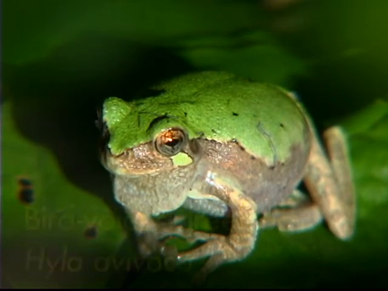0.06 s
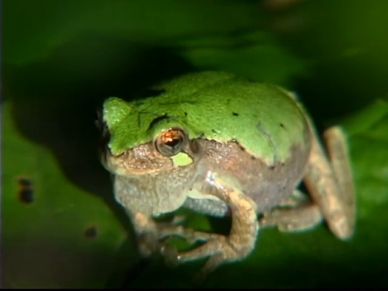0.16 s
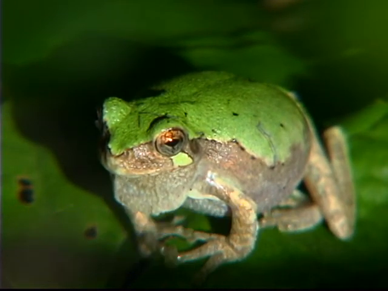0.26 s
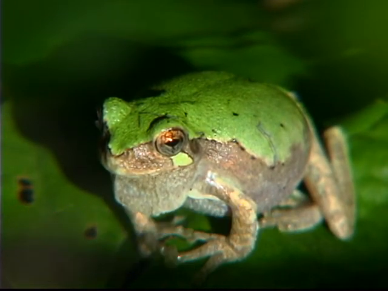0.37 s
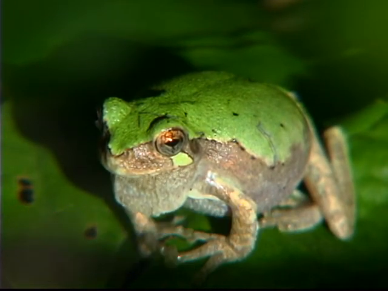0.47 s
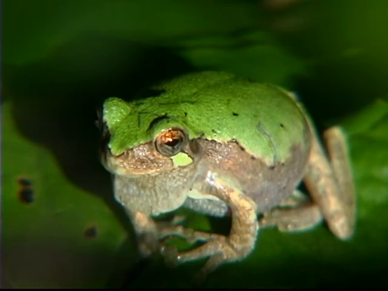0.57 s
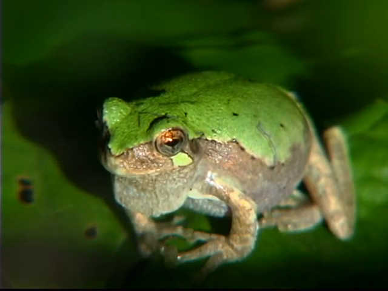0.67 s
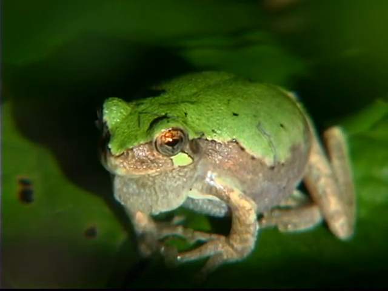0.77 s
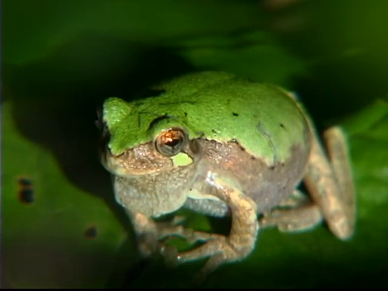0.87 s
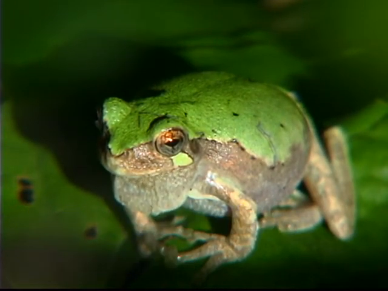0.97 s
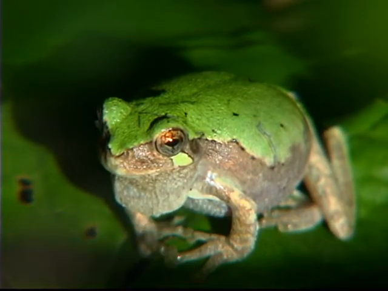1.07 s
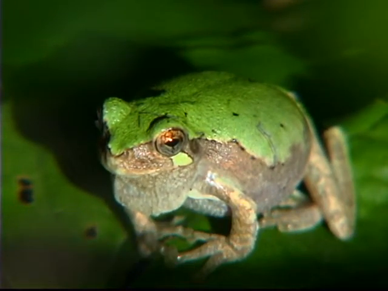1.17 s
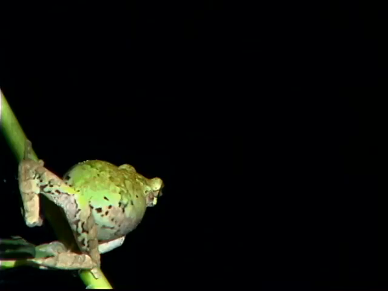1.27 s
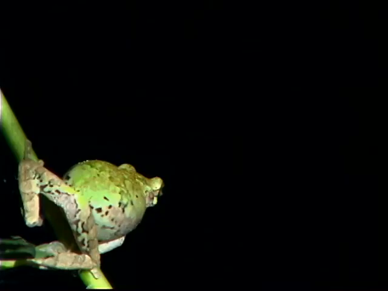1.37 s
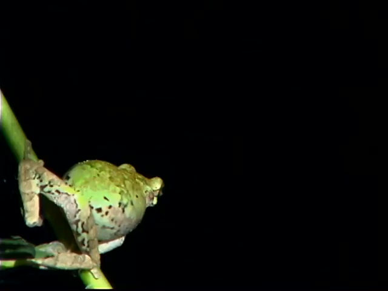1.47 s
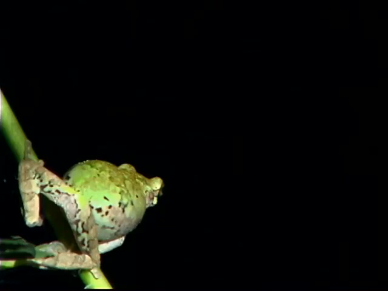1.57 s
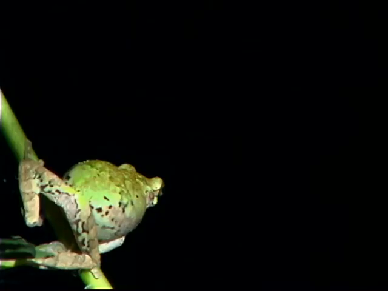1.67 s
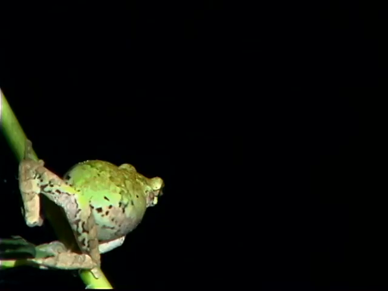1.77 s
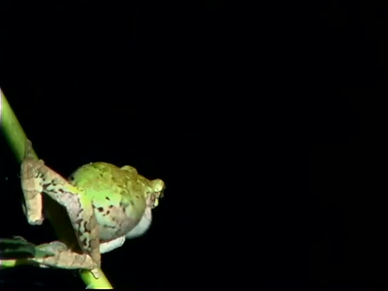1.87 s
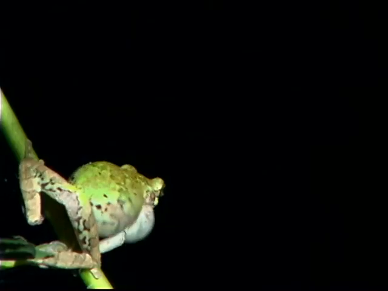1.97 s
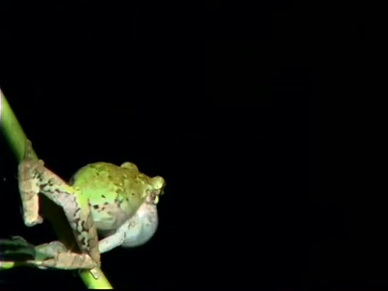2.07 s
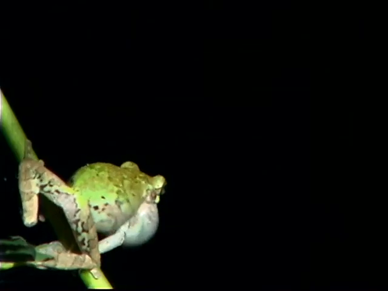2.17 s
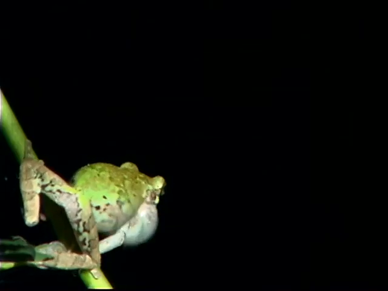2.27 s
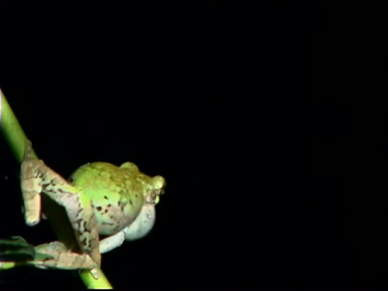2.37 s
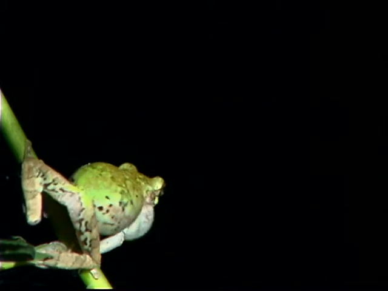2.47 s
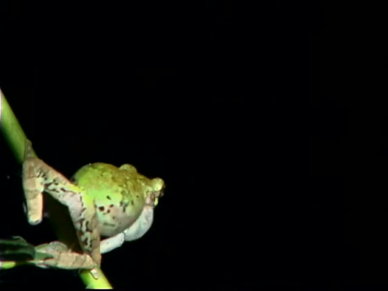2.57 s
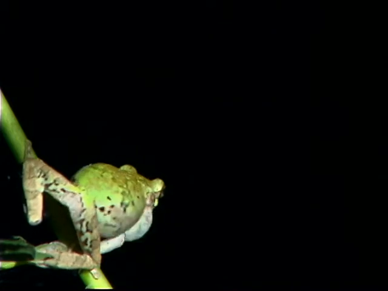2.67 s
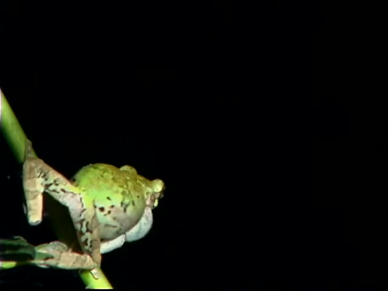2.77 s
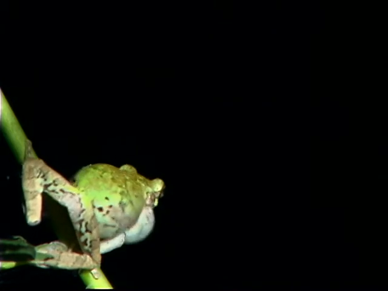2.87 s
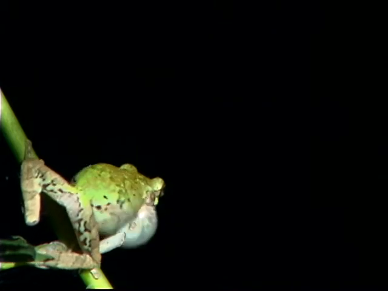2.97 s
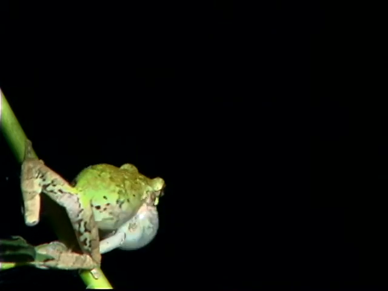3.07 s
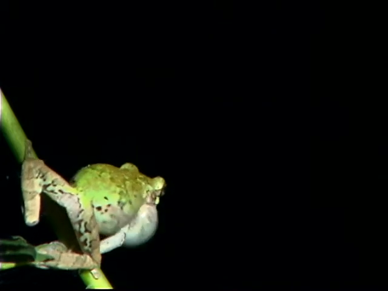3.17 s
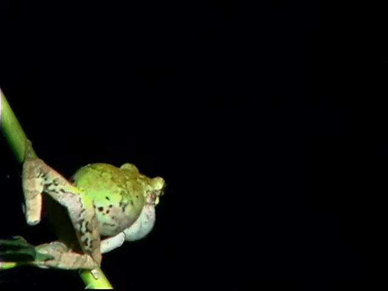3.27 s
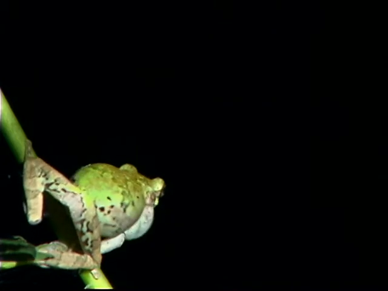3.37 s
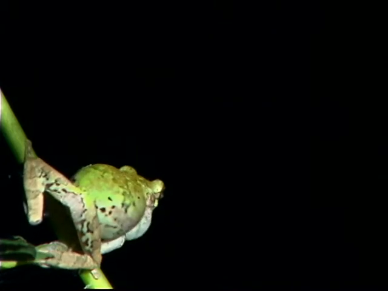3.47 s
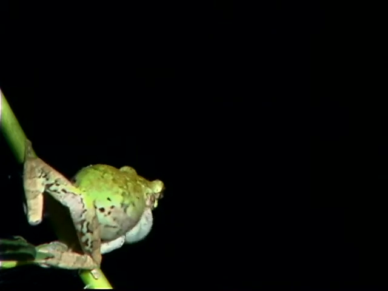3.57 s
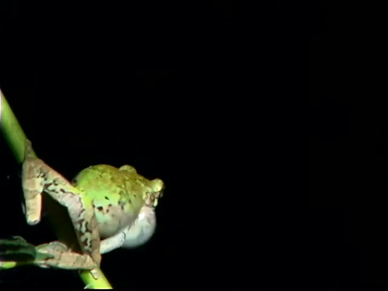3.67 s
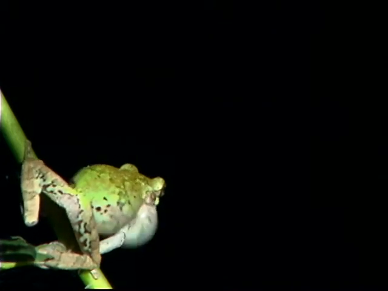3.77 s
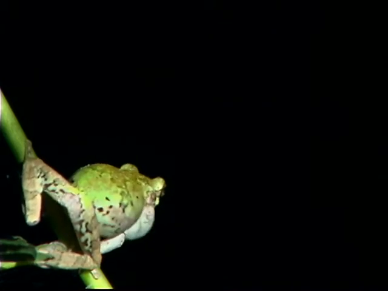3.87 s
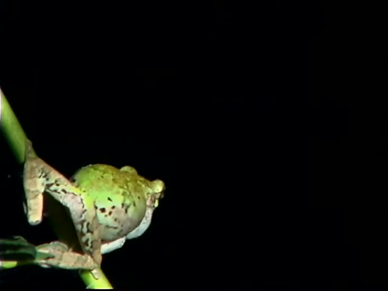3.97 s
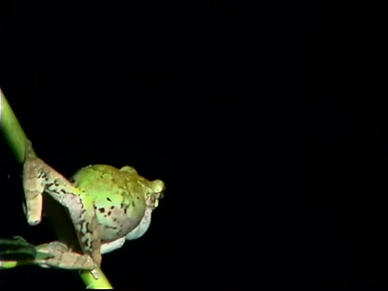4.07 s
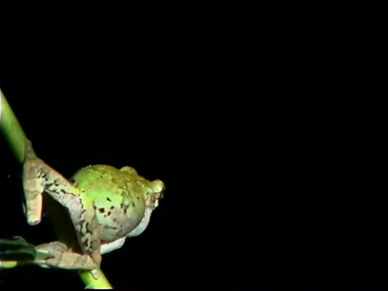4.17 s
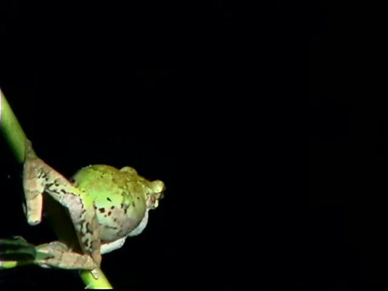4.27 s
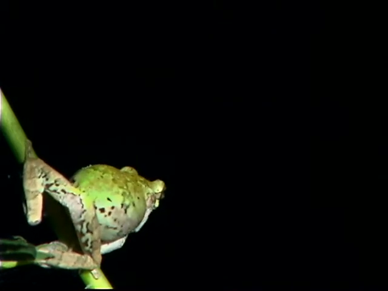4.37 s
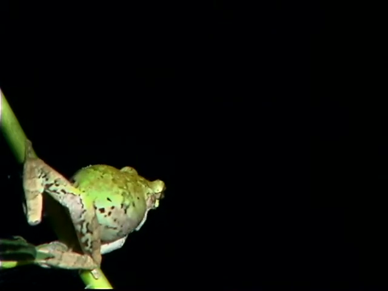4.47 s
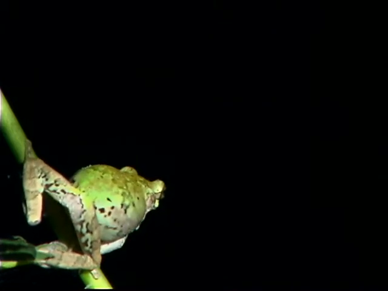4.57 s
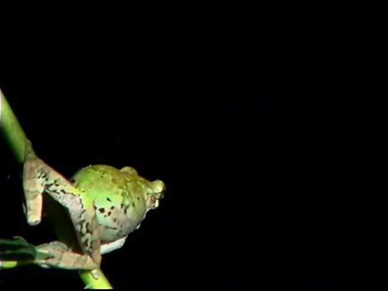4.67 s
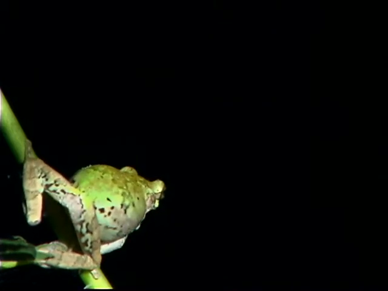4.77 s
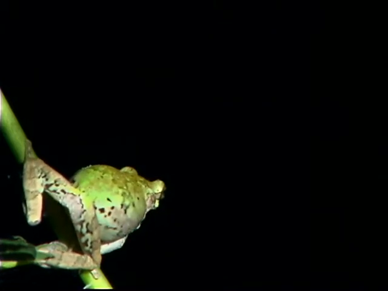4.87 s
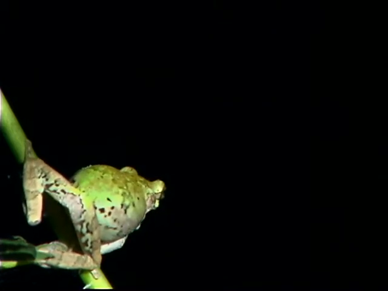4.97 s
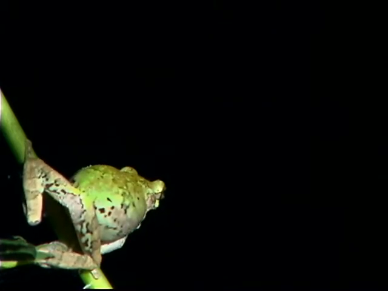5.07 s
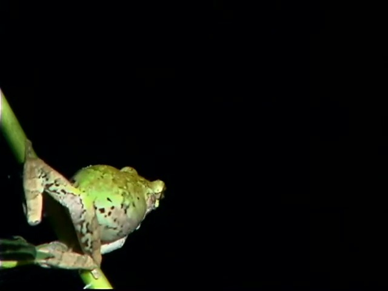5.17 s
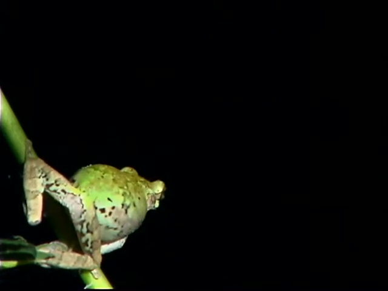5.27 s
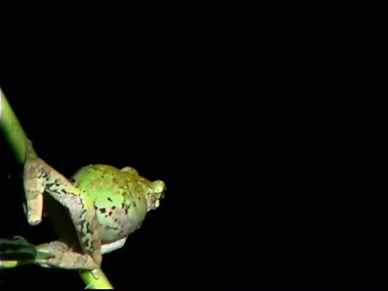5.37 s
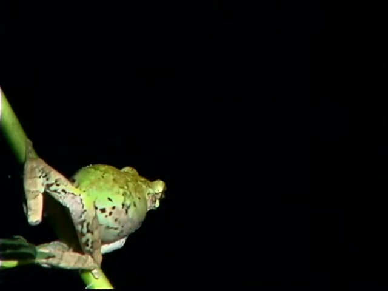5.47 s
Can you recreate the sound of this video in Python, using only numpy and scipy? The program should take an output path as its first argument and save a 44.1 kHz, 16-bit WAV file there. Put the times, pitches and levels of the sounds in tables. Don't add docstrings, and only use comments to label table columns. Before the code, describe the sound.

A swamp pond at night, heard through a microphone near one treefrog. From the start, a blurred high drone of countless far frogs holds steadily, with soft hiss and a barely audible, very high electric whine. From 0 to 1.8 s, neighbours in the bushes pipe short whistles about eight a second, slightly different in pitch, while a lower dry trill runs from 0.3 to about 2.5 s. At 1.8 s the close frog enters, much louder: nineteen pure whistles, each about a twentieth of a second, sliding upward, swelling and snapping shut, evenly repeated until 3.9 s. A short bright echo follows each. Around 4 s a few hollow clucks pop, and a second frog's weaker whistles continue to 4.6 s. A grainy rasp fills 4.7 to 5.4 s with uneven hoarse notes. Rough low croaks mutter far off, clearest near 5.4 s, as the second frog whistles again.

```python
import sys
import numpy as np
from scipy import signal
from scipy.fft import rfft, irfft, next_fast_len
from scipy.io import wavfile
from scipy.ndimage import map_coordinates

SR = 44100
rng = np.random.default_rng(int(sys.argv[2]) if len(sys.argv) > 2 else 0)


def boost(x):
    u = np.asarray(x, float) / 20
    return 10 ** u


def log_audio(samples):
    frames = np.atleast_2d(samples).T
    limited = np.clip(frames, -1, 1)
    pcm = np.round(limited * 32767).astype(np.int16)
    wavfile.write(sys.argv[1], SR, pcm)


N = 242991


def unit(x):
    return x / np.sqrt(np.mean(x ** 2) + 1e-20)


def along(points, hz):
    f, v = np.transpose(points)
    return np.interp(np.log(hz + 1), np.log(f + 1), v)


def wobble(rate):
    knots = rng.standard_normal(int(N * rate / SR) + 4)
    return map_coordinates(knots, [np.arange(N) * rate / SR])


def span(start, end, rise, fall):
    t = np.arange(N) / SR
    return np.clip((t - start) / rise, 0, 1) * np.clip(1 - (t - end) / fall, 0, 1)


def filtered(x, response):
    m = next_fast_len(N + SR // 2)
    return irfft(rfft(x, m) * response(np.fft.rfftfreq(m, 1 / SR)), m)[:N]


def coloured_noise(response):
    return unit(filtered(rng.standard_normal(N), response))


def mode(f, hz, width_hz):
    return 1j * f * width_hz / (hz * hz - f * f + 1j * f * width_hz)


def empty_track():
    return np.zeros(N + 2 * SR)


def add(track, s, sound):
    track[round((s + 1) * SR):][:len(sound)] += sound


def trimmed(track):
    return track[SR:][:N]


def ping(hz, life):
    t = np.arange(round(8 * life * SR)) / SR
    return t / life * np.exp(1 - t / life) * np.sin(2 * np.pi * hz * t + rng.uniform(0, 2 * np.pi))


# f/Hz, time to fall 60 dB t/s
ECHO_TIMES = [(1500, 1), (2500, 0.21), (5000, 0.21), (12000, 0.1)]


def swamp(x, size=12288):
    wet = np.zeros(N + SR)
    for start in range(0, N, size):
        hz, t, z = signal.stft(rng.standard_normal(SR // 4), SR, nperseg=256)
        fading = z * boost(-60 * t / along(ECHO_TIMES, hz)[:, None])
        tail = signal.istft(fading, SR, nperseg=256)[1]
        echo = signal.fftconvolve(x[start:start + size], tail / np.linalg.norm(tail))
        wet[start + 130:][:len(echo)] += echo
    return wet[:N]


# f/Hz, level/dB (per Hz)
HISS_COLOUR = [(12, -33), (25, -17), (59, -14), (226, -20), (333, -19), (1200, -25.5), (2500, -26),
               (4970, -29), (6200, -29), (9000, -32), (15600, -34)]
WHINE_GAPS = [
    .54,
    2.87,
    4.41,
]


def night():
    t = np.arange(N) / SR
    hiss = boost(-59.5 + 0.42 * wobble(1.4)) * coloured_noise(lambda f: boost(along(HISS_COLOUR, f)))

    insect_start_s, insect_db, fades_db_per_s = 5.38, -66, 60
    insect = boost(insect_db - fades_db_per_s * np.abs(t - insect_start_s)) * np.sin(2 * np.pi * 1460 * t)
    insect = insect * span(insect_start_s, N / SR, rise=0.0089, fall=1)

    steady = 1 - sum(np.clip(2 - np.abs(t - s) / .012, 0, 1) for s in WHINE_GAPS)
    whine = boost(-78.0 + 1.2 * wobble(4.2)) * steady * np.sin(2 * np.pi * 15734 * t)
    return hiss + insect + whine


# start t/s, length t/s, level/dB, throat f/Hz
CROAKS = [(-.1, 0.17, -66, 790), (1.215, 0.42, -65.5, 715), (1.745, 0.77, -63.5, 735),
          (2.6, .25, -65.5, 710), (2.9, .3, -60, 810), (3.2, 0.39, -62, 723), (3.59, 0.45, -59.5, 837),
          (4.024, 0.14, -61.5, 770), (4.25, 0.46, -60, 825), (4.8, 0.48, -65, 770), (5.386, .2, -54, 750)]


def croakers():
    rise_s, fall_s, rest_db, rest_hz = 0.048, 0.14, -74.5, 740
    bouts = np.array([boost(2 * db) * span(s, s + length, rise_s, fall_s) ** 2 for s, length, db, _ in CROAKS])
    rest = boost(2 * rest_db)
    power = rest + bouts.sum(axis=0)
    throat_hz = (rest * rest_hz + np.transpose(CROAKS)[3] @ bouts) / power
    share = np.clip((throat_hz - 660) / 230, 0, 1)
    low = coloured_noise(lambda f: mode(f, 714, 165) ** 2)
    high = coloured_noise(lambda f: mode(f, 802, 233) ** 2)
    throat = np.sqrt(1 - share) * low + np.sqrt(share) * high
    return np.sqrt(power) * boost(-4.5 + 1.1 * wobble(16)) * throat


def whistle(length, first_hz, last_hz, fall_hz, close=0.0037, bend=.4):
    surge_hz, surge_s, surge_gain = 70, 0.0076, 0.1
    scoop_hz, scoop_s = 128, .008
    floor = 0.06
    t = np.arange(round((length + close) * SR)) / SR
    shut = np.clip((t - length) / close + 0.506, 0, 1)
    surge = np.exp(np.minimum(t - length, 0) / surge_s)

    bent = surge_hz * (surge - 0.46 * t / length) - scoop_hz * np.exp(-t / scoop_s)
    climb = first_hz + (last_hz - first_hz) * t / length + bend * bent
    phase = 2 * np.pi * np.cumsum(climb - fall_hz * shut ** 2.27) / SR + rng.uniform(0, 2 * np.pi)

    effort = floor + (1 - floor) * np.minimum(t / (length - .005), 1)
    effort = effort * (1 - np.exp(-t / 0.00092)) * (1 + surge_gain * surge)
    release = np.cos(shut * np.pi / 2)
    return climb, phase, np.abs(effort) + 1e-4, np.abs(release) + 1e-4


def other_whistlers(notes, length):
    track = empty_track()
    for end, first_hz, last_hz, db, octave_db in notes:
        hz, phase, effort, release = whistle(length, first_hz, last_hz, fall_hz=150)
        carries = effort ** 0.24 * np.exp(-((hz - 2470) / 170) ** 2 / 2)
        octave = boost(octave_db + 3.0) * carries * np.cos(2 * phase)
        note = release ** 2.9 * (effort * np.cos(phase) + octave)
        add(track, end - length, boost(db + 1.5) * note)
    return trimmed(track)


# t/s, level/dB
CHORUS_LEVEL = [(0.0, -43.5), (0.57, -48.5), (0.89, -47.5), (1.18, -44.5), (2.04, -45.5), (3.19, -49),
                (3.31, -48), (3.68, -47), (4.05, -46), (4.47, -45.5), (4.57, -46.5), (4.9, -45),
                (5.51, -44)]
# f/Hz, level/dB
CHORUS_COLOUR = [(1900, -31.5), (2100, -9.5), (2250, -7), (2450, -4.5), (2600, -8), (2750, -25),
                 (4200, -29.5), (4900, -11), (5500, -48.5)]


def chorus(count=1000):
    draw = rng.standard_normal((count, 3))
    starts = np.sort(rng.uniform(0, N / SR, count))
    notes = [(s, 2320 + 110 * a - 40 * c, 2470 + 110 * a, 0.92 * b, -19) for s, (a, b, c) in zip(starts, draw)]
    crowd = other_whistlers(notes, length=0.049)
    haze = coloured_noise(lambda f: mode(f, 2390, 800))
    blur = 0.2 * unit(crowd) + unit(swamp(crowd)) + 0.52 * haze
    level_db = np.interp(np.arange(N) / SR, *np.transpose(CHORUS_LEVEL))
    return boost(level_db - 3.5) * unit(filtered(blur, lambda f: boost(along(CHORUS_COLOUR, f))))


def trill():
    start_s, gap_s, slows_s, pulses, strong_pulses = .309, .0535, .00018, 40, 31
    level_db, starts_under_db, warms_s, scatter_db, ends_under_db = -53.5, 8.5, 0.87, 3, 10
    track = empty_track()
    k = np.arange(pulses)
    since = gap_s * k + slows_s * k ** 2 / 2
    pulse_db = level_db - starts_under_db * np.exp(-since / warms_s)
    pulse_db = pulse_db + scatter_db * rng.standard_normal(pulses)
    pulse_db = pulse_db - ends_under_db * (k >= strong_pulses)
    for s, db in zip(start_s + since, pulse_db):
        add(track, s, boost(db) * ping(1615, life=0.0024))
        add(track, s, boost(db - 7) * ping(3220, life=.0025))
    return trimmed(track)


# t/s, peak level/dB, f/Hz
CLUCKS = [(3.941, -53, 1650), (3.979, -36.5, 2090), (3.987, -51, 1700), (4.017, -45, 2000),
          (4.026, -52, 1620), (4.042, -54, 1680), (4.066, -50, 1850), (4.088, -58, 1590), (4.70, -52, 1840),
          (4.72, -53, 1830), (5.385, -58, 1680)]


def clucks():
    track = empty_track()
    for s, db, hz in CLUCKS:
        add(track, s, boost(db - 4.5) * ping(hz, life=0.003))
    return trimmed(track)


def rasp():
    start_s, end_s, edge_s, level_db = 4.675, 5.39, 0.01, -54
    track = empty_track()
    for s in np.linspace(4.66, 5.4, num=70):
        pulse = ping(2150 + rng.normal(0, 75), life=0.0021)
        add(track, s + rng.normal(0, 0.0025), boost(rng.normal(0, 3)) * pulse)
    held = span(start_s, end_s - edge_s, edge_s, edge_s)
    return held * boost(level_db - 10.5) * unit(trimmed(track))


# first f/Hz, last f/Hz, octave overtone level/dB, note length t/s
STEADY_VOICE = (2335, 2489, -29, .045)
DEEP_VOICE = (2215, 2273.5, -27.5, .045)
LEVEL_VOICE = (2399.5, 2404, -33, 0.07)
THIN_VOICE = (2472, 2510, -33, 0.14)
HOARSE_VOICE = (2097.5, 2230, -21, 0.0957)
BRIGHT_VOICE = (2399.5, 2518, -12.5, 0.01)
# end t/s, peak level/dB
STEADY_NOTES = [(.073, -41.5), (.197, -43), (.315, -42.5), (.428, -40), (.545, -40.5), (.666, -40.5),
                (.783, -41.5), (.896, -40), (1.155, -41.5), (1.259, -45.5), (1.377, -42.5), (1.487, -49),
                (1.593, -46.5), (1.689, -46.5), (1.829, -49)]
DEEP_NOTES = [(.244, -48), (.314, -50), (.718, -43), (.92, -46), (1.035, -45), (1.14, -49.5),
              (1.266, -40.5), (1.397, -40.5), (1.54, -41.5), (1.675, -41.5), (1.781, -45), (1.942, -40),
              (2.065, -39), (2.213, -41), (2.394, -41.5), (2.58, -42), (2.723, -40.5), (2.86, -40)]
LEVEL_NOTES = [(0.604, -45), (.957, -41.5), (1.019, -41), (1.066, -40.5), (1.525, -45.5), (1.56, -48),
               (1.623, -47.5), (2.002, -47), (2.361, -44), (2.881, -44), (3.713, -47.5), (3.827, -45.5),
               (4.603, -43.5), (4.945, -47.5)]
THIN_NOTES = [(4.025, -51), (4.15, -51.5), (4.268, -47.5), (4.371, -53), (4.499, -47.5), (4.6, -51.5)]
HOARSE_NOTES = [(4.83, -49), (4.853, -45), (5.01, -48), (5.068, -56), (5.11, -44), (5.21, -47),
                (5.292, -46.5)]
BRIGHT_NOTES = [(1.036, -55), (1.167, -54), (1.285, -51), (1.394, -53), (1.512, -52), (1.639, -51),
                (1.762, -53), (1.885, -58), (3.22, -46), (3.335, -51), (3.455, -48.5), (3.576, -54),
                (3.704, -52), (3.83, -58)]


def neighbours():
    scatter_hz = 15.8
    frogs = [(STEADY_VOICE, STEADY_NOTES), (DEEP_VOICE, DEEP_NOTES), (LEVEL_VOICE, LEVEL_NOTES),
             (THIN_VOICE, THIN_NOTES), (HOARSE_VOICE, HOARSE_NOTES), (BRIGHT_VOICE, BRIGHT_NOTES)]
    out = np.zeros(N)
    for (first_hz, last_hz, octave_db, length), notes in frogs:
        off = scatter_hz * rng.standard_normal((len(notes), 2))
        sung = [(s, first_hz + a, last_hz + b, db, octave_db) for (s, db), (a, b) in zip(notes, off)]
        out = out + other_whistlers(sung, length)
    return out


EFFORT_POWER = [0.99, 0.8, 0.4, 0.85, 0.32, .3]


def close_frog(notes, sac, fall_hz, close, yelp_db):
    track = empty_track()
    for end, length, first_hz, last_hz, db in notes:
        hz, phase, effort, release = whistle(length, first_hz, last_hz, fall_hz, close=close, bend=1)
        scatter_db = rng.normal(0, 1.5, 7) * (np.arange(7) > 2)
        linger = boost(rng.normal(1.9, 1.5))
        note = np.zeros(len(hz))
        for n, (overtone, centre, width, level) in enumerate(sac):
            k = int(overtone)
            lobe = boost(level + scatter_db[k]) * np.exp(-((k * hz - centre) / width) ** 2 / 2)
            if k > 2:
                sign, cut = (-1) ** n, 5.5
            else:
                sign, cut = 1, 1.75 / k ** 2.93
            strength = effort ** EFFORT_POWER[k - 1] * release ** (cut * linger)
            note += sign * lobe * strength * np.cos(k * phase)
        add(track, end - length, boost(db + 2.0) * note)
        add(track, end - length - .001, boost(db + yelp_db) * ping(3020, life=0.00049))
    return trimmed(track)


# end t/s, length t/s, last f/Hz, peak level/dB
SECOND_NOTES = [(3.1, .022, 2300, -51), (3.264, .022, 2300, -56), (3.413, .022, 2300, -51),
                (3.564, .026, 2310, -47), (3.652, .022, 2340, -50), (3.77, 0.029, 2360, -55),
                (3.885, .024, 2290, -52), (3.984, .026, 2290, -45), (4.086, .024, 2290, -41.5),
                (4.204, 0.033, 2290, -39.5), (4.311, .035, 2380, -40), (4.422, 0.037, 2376, -38.5),
                (4.53, 0.041, 2376, -39.5), (4.636, 0.035, 2371, -38.5), (5.293, .029, 2357, -48),
                (5.411, .044, 2452, -40.5), (5.516, .04, 2470, -39)]
# overtone number, f/Hz, width f/Hz, level/dB
SECOND_SAC = [(1, 2210, 280, -0.5), (1, 2435, 22, 6), (2, 4484, 85, -9), (2, 4770, 57, -15),
              (3, 7020, 62, -28.5), (4, 9200, 98, -29), (5, 11400, 70, -30), (5, 11800, 100, -21.5)]


def second_frog():
    start_hz, lower_hz_per_s = 2380, 2480
    notes = [(s, n, start_hz - lower_hz_per_s * n, hz, db) for s, n, hz, db in SECOND_NOTES]
    return close_frog(notes, SECOND_SAC, fall_hz=420, close=.0075, yelp_db=-19)


# end t/s, length t/s, last f/Hz, peak level/dB
NEAR_NOTES = [(1.836, 0.039, 2502, -25.5), (1.9438, .042, 2630, -22.5), (2.065, 0.051, 2643, -21.5),
              (2.1803, 0.051, 2665, -21), (2.2833, 0.047, 2669, -21), (2.4, 0.046, 2657, -21),
              (2.5087, 0.049, 2664, -21), (2.6178, 0.045, 2670, -21), (2.7302, .048, 2666, -21),
              (2.8424, 0.048, 2660, -21), (2.9581, 0.049, 2652, -21.5), (3.0687, 0.048, 2663, -21),
              (3.1844, .0473, 2660, -21), (3.2996, 0.047, 2650, -21.5), (3.414, .044, 2647, -21),
              (3.5352, 0.046, 2647, -21), (3.6536, 0.046, 2640, -21.5), (3.7817, 0.049, 2646, -21),
              (3.904, 0.045, 2640, -21.5)]
# overtone number, f/Hz, width f/Hz, level/dB
NEAR_SAC = [(1, 2561, 131, -1.05), (1, 2660, 52, -30), (2, 4890, 640, -22), (2, 5290, 30, -32),
            (3, 7400, 160, -35), (3, 7830, 120, -35.5), (4, 10240, 310, -39), (5, 12680, 180, -32),
            (5, 13080, 85, -34), (5, 13330, 40, -44.5), (6, 15000, 120, -51), (6, 15650, 180, -47)]


def near_frog():
    start_hz, tires_hz_per_s = 2498, 11.5
    bout_s = NEAR_NOTES[0][0]
    notes = [(s, n, start_hz - tires_hz_per_s * (s - bout_s), hz, db) for s, n, hz, db in NEAR_NOTES]
    return close_frog(notes, NEAR_SAC, fall_hz=600, close=0.0054, yelp_db=-26)


def scene():
    near = near_frog()
    second = second_frog()
    bushes = neighbours()
    small = trill() + clucks() + rasp()
    echoes = swamp(boost(-18.5) * near + boost(-9.5) * second + boost(-10) * bushes + boost(-10.5) * small)
    background = chorus() + croakers() + night()
    return (near + second + bushes + small + echoes + background)[None]


def band_limit(x):
    return signal.sosfilt(signal.butter(12, 15770, fs=SR, output="sos"), x)


def record(dry):
    return band_limit(dry - .0003)


dry = scene()
out = record(dry)
log_audio(out)
```